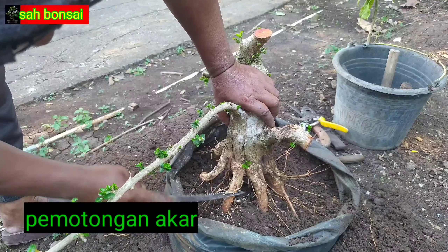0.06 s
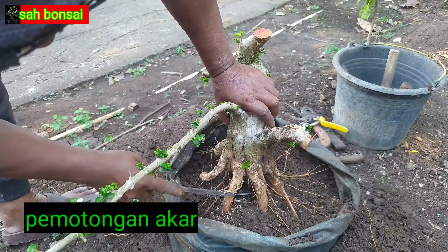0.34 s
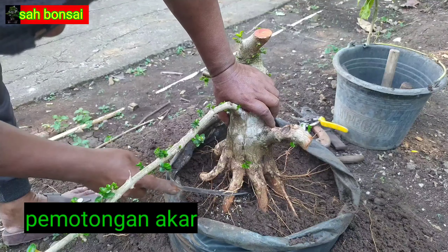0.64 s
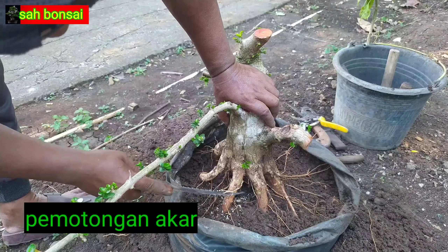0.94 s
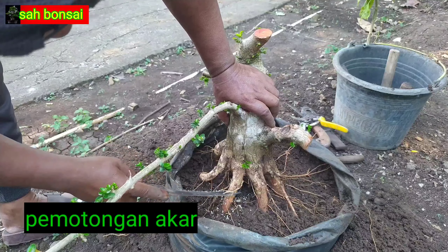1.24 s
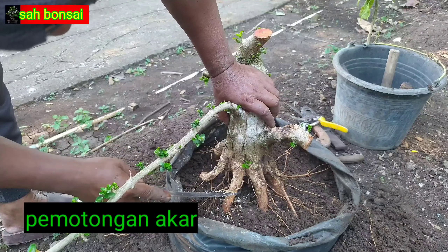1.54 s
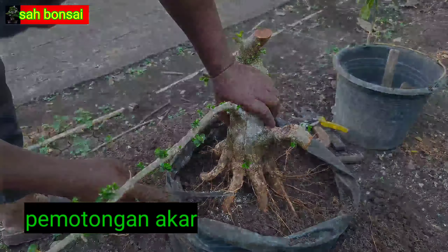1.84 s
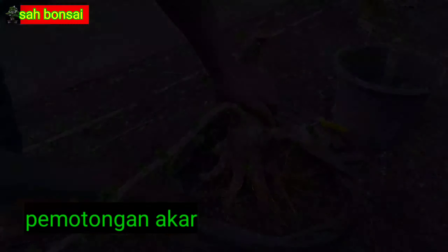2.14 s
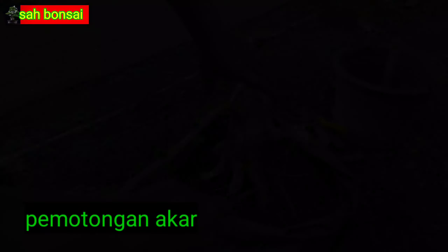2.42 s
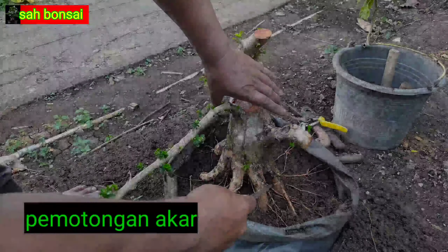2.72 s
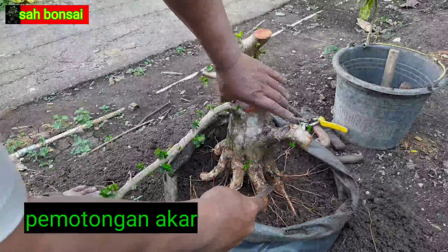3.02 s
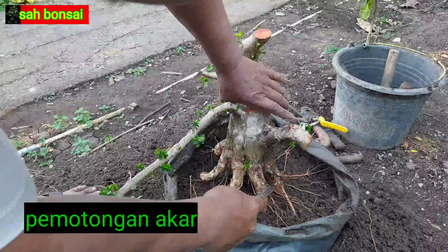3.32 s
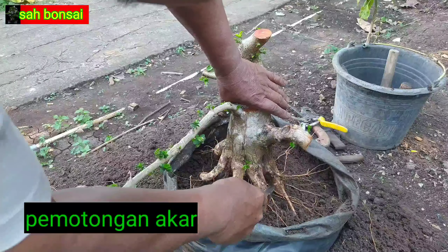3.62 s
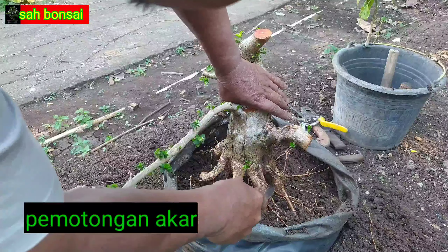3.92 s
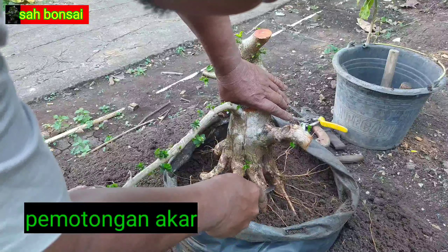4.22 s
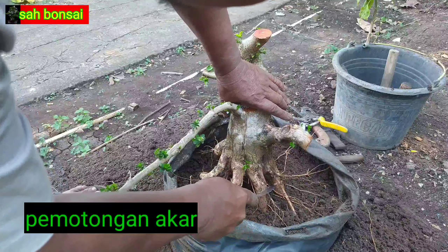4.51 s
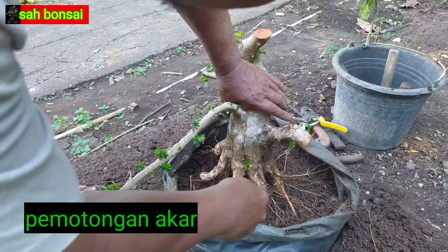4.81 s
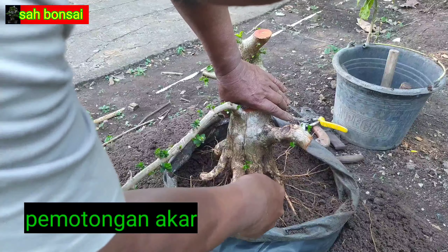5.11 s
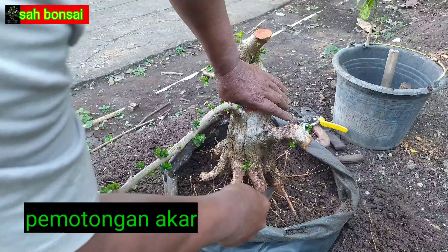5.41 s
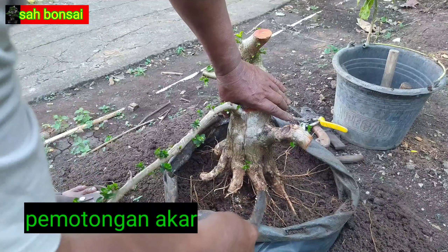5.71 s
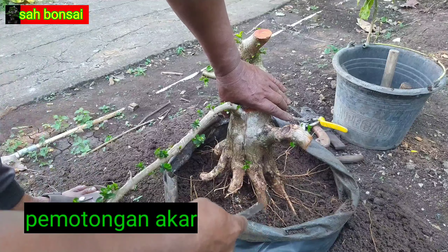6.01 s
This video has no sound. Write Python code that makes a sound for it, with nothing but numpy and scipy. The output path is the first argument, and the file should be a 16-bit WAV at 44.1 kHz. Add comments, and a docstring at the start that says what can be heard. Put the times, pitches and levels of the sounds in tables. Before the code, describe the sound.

Close to the microphone, a pruning saw rasps through woody roots in quick, uneven strokes. Its teeth catch and snap free with sharp cracks and a brief ring, and the root knocks dully. Midway the sawing pauses, leaving a faint rustle of soil, then resumes more lightly. Further off in the yard a small bird chips steadily until near the end.

```python
"""A yard outdoors, one microphone close to a small tree standing in a bag of soil.
A pruning saw works through its woody roots: the teeth rasp on each stroke and now and then snag and
snap free, ringing the blade; the root ball thuds, and loose soil rustles between strokes.
Further off a small bird chips steadily, echoed by the yard; far away, an engine and two bird whistles.
The microphone thins the bass, and a noise suppressor turns down the quiet moments."""
import sys
import numpy as np
from scipy import signal
from scipy.fft import rfft, irfft
from scipy.io import wavfile
from scipy.ndimage import uniform_filter1d

SR = 44100
rng = np.random.default_rng(int(sys.argv[2]) if len(sys.argv) > 2 else 0)


def wrap_up_sound(samples):
    """Save the sound to the file named by the first command line argument, as 16-bit audio."""
    columns = np.atleast_2d(samples).T
    # keep every value between -1 and 1, then stretch to whole-number steps
    tamed = np.clip(columns, -1, 1)
    steps = np.round(tamed * 32767).astype(np.int16)
    wavfile.write(sys.argv[1], SR, steps)


N = 271215
TIME = np.arange(N) / SR

# open air in the yard: frequency_hz, level_db
AIR_SPECTRUM = [(18, -38), (30, -58.5), (48, -15), (129, 8), (382, -3), (554, 0), (745, -6.5), (1160, -6.5),
                (1640, -11.5), (4200, -16.5), (5650, -24.5), (9480, -14), (11000, -61), (14300, -52.5),
                (22000, -120)]
# the far engine's course: time_s, pitch_hz, level_db
ENGINE_DRONE = [(0, 288, -91.5), (3.2, 287.4, -85.5), (3.75, 282.4, -73.5), (4.0, 274.1, -86),
                (4.95, 248.2, -75.5), (5.5, 236.2, -74.5), (5.9, 260.2, -76), (6.15, 255, -87)]
# the blade sliding lightly through loose soil: time_s, rustle_db, hiss_db
SOIL_LEVELS = [(0.0, -65, -82), (0.58, -77, -76), (1.01, -79, -81), (1.16, -65.5, -79), (1.3, -77, -88),
               (1.42, -65.5, -76), (1.56, -70.5, -77.5), (2.02, -74.5, -87), (2.4, -91, -90),
               (2.57, -74, -72), (2.83, -84.5, -82), (3.25, -77.5, -86.5), (4.44, -73.5, -72),
               (4.71, -69.5, -93), (5.02, -72.5, -71), (5.55, -77.5, -92), (5.86, -70.5, -72),
               (6.15, -79, -80.5)]
# shifting crumbs: frequency_hz, level_db
RUSTLE_SPECTRUM = [(150, -12), (400, -0.5), (1100, 2), (1500, -10.5), (3500, -1.5), (5500, -14.5),
                   (9800, -15.5), (10800, -36)]
# soil on the flat of the blade: frequency_hz, level_db
HISS_SPECTRUM = [(2000, -18), (4000, -4.5), (5500, -13), (8000, -6.5), (9600, 4), (10800, -17.5)]
# the shaken root ball: frequency_hz, level_db
THUD_SPECTRUM = [(50, -31.5), (80, -20.5), (108, 0), (160, -6), (210, -17.5), (400, -20), (900, -43.5)]

# saw strokes: fastest_s, length_s, level_db, treble_db
SAW_STROKES = [(.008, 0.035, -40.5, -2), (0.173, 0.079, -56.5, -3), (0.233, 0.028, -46.5, -3),
               (.265, 0.034, -47, 2), (0.382, 0.077, -59.5, -3), (0.451, 0.046, -51.5, 1.5),
               (.523, .04, -52.5, 2.5), (0.563, 0.044, -46, -0.5), (0.696, 0.053, -52, -2.5),
               (0.801, 0.047, -47, -1), (.829, 0.024, -50, -3), (0.899, 0.14, -65, 4),
               (1.055, 0.025, -55, -2), (1.092, 0.027, -49.5, -10), (1.37, 0.051, -48, -1),
               (1.501, 0.036, -60, 2), (1.646, 0.059, -53.5, 14), (1.746, 0.056, -58, 0),
               (1.885, .042, -51.5, 1.5), (2.466, .06, -54, 6), (2.582, 0.063, -48.5, -1),
               (2.652, 0.02, -42, 1), (2.688, 0.037, -48, -4), (4.083, 0.02, -63, 3),
               (4.41, 0.023, -57, 0.5), (4.52, 0.021, -46, 4), (4.545, 0.047, -46.5, 2),
               (4.678, 0.069, -57.5, 3), (4.773, 0.017, -54.5, -2.5), (4.821, 0.058, -47.5, 0),
               (4.976, 0.058, -55, 1.5), (5.116, 0.057, -53, 1), (5.264, 0.019, -61.5, 1.5),
               (5.388, 0.13, -64.5, 4), (5.651, 0.057, -44.5, 0), (5.7, 0.033, -52, 4.5),
               (5.871, 0.021, -61, -20)]
# the roots in the order they are cut, a stout one first; blade_hz is the free blade's main ring:
# until_s, stroke_thud_db, snag_knock_db, ring_over_rasp_db, blade_hz
ROOTS_CUT = [(2.25, -51, -36.5, -10.5, 8740), (4.3, -57, -47.5, -13.5, 9710), (5.55, -55, -50, -18, 8670),
             (6.2, -51.5, -50.5, -27.5, 8830)]
# fibres tearing under the teeth: frequency_hz, level_db
RASP_SPECTRUM = [(150, -44), (250, -10.5), (486, -5.5), (1110, -2.5), (1320, -7.5), (1670, -5),
                 (2370, -5.5), (3100, 3.5), (4060, 1.5), (5570, -14.5), (6420, -8.5), (7520, -12.5),
                 (9540, -6), (10200, -22.5), (11000, -12), (14300, -60), (22000, -120)]
# resonances of root and blade that colour the rasp: centre_hz, width_hz, level_db
RASP_RESONANCES = [(1606, 120, -5), (2930, 400, -13.5), (3940, 140, -1.5), (6920, 310, -1),
                   (9940, 1000, 4.5)]
# modes of the root: pitch_hz, t60_s, level_db
ROOT_MODES = [(523, 0.026, -10.5), (920, 0.019, -4), (1083, 0.032, 1.5), (1720, 0.017, -2)]

# the small bird's chips: middle_s, level_db
BIRD_CHIPS = [(0.128, -57), (0.335, -54.5), (0.533, -49.5), (0.734, -51), (0.935, -55.5), (1.152, -50.5),
              (1.364, -50), (1.571, -54), (1.811, -54.5), (2.035, -57), (2.17, -67), (2.249, -60),
              (2.391, -61), (2.818, -60), (2.909, -70), (3.03, -56.5), (3.238, -55.5), (3.466, -56.5),
              (3.693, -57), (3.941, -56), (4.168, -55.5), (4.406, -58.5), (4.637, -56), (4.86, -54.5),
              (5.083, -55), (5.315, -57.5)]
# the course of one chip: from_middle_s, pitch_hz, level_db, hoarseness (0-1)
CHIP_SHAPE = [(-.014, 1930, -22, 0), (-.007, 2023, -7, 0), (0, 2190, -2.5, .03), (.008, 2370, -4.5, .4),
              (.016, 2000, 0, .85), (.023, 1500, -2.5, .9), (.032, 1156, -2.5, .85), (.042, 1000, -17, 1)]

# a tooth snags and snaps free: start_s, level_db, flex_hz, treble_db
TOOTH_SNAGS = [(0.1528, -21, 2790, -44), (0.1587, -22.5, 3150, -19), (0.2, -32, 2980, -42),
               (0.4401, -39, 3500, -16), (0.7009, -36, 3920, -12), (0.7875, -31, 3100, -12),
               (0.814, -24.5, 3930, -18), (.827, -28, 3050, -3.5), (1.0744, -23.5, 4400, -8),
               (1.0893, -26, 4230, 0), (1.3467, -24.5, 4050, -9.5), (1.359, -26.5, 4260, -1),
               (1.3732, -25, 3790, -9), (1.3869, -27.5, 4100, -5.5), (1.607, -18.5, 3900, -3),
               (1.6204, -17.5, 3750, 0), (1.6301, -18.5, 3950, -1.5), (1.646, -24.5, 3540, 4.5),
               (1.6642, -22, 3860, -0.5), (1.8809, -39, 3960, 1.5), (2.4147, -26.5, 3650, -3),
               (2.4214, -31, 3920, -4.5), (2.4331, -26.5, 3100, -2), (2.439, -36, 3140, -8),
               (2.448, -33.5, 2800, 5), (2.4563, -36.5, 4550, 10.5), (2.4664, -30.5, 3720, -7),
               (2.4748, -33, 4140, -12), (2.4878, -28, 3730, -4), (2.5631, -34, 3760, -1.5),
               (2.5709, -34, 3700, -3), (2.581, -29, 3850, -1.5), (2.589, -27, 3530, -2.5),
               (2.6426, -31, 3620, -10), (2.6464, -27.5, 4050, -10), (4.5142, -24.5, 4030, -8),
               (4.5252, -37, 4100, -12.5), (4.6525, -39, 4070, -14), (4.806, -34.5, 4100, -14),
               (5.6376, -38, 3270, -12)]
# a fibre cracking: frequency_hz, level_db
CRACK_SPECTRUM = [(300, -19), (1000, 0.5), (1350, -13), (1800, -3.5), (2500, -4), (3600, 5), (4500, 0.5),
                  (5500, -7), (6600, -2.5), (8000, -0.5), (9800, 10), (11000, -13.5)]
# high modes of the blade, damped by the wood around it: ratio_to_blade_hz, level_db
BLADE_MODES = [(1, 2), (1.013, -2), (1.11, -12), (1.07, -10), (.81, -11)]
# knocks of the root as it gives: start_s, pitch_hz, peak_db
ROOT_KNOCKS = [(0.819, 152, -43.5), (1.087, 147, -46), (1.36, 159, -42.5), (1.7, 540, -51),
               (2.383, 870, -52), (2.592, 397, -52), (2.659, 382, -51.5), (2.676, 620, -49),
               (2.692, 356, -52), (4.388, 150, -55.5), (5.64, 393, -48.5), (5.866, 600, -54.5),
               (5.871, 1400, -51), (5.875, 2130, -47)]
# a far bird's whistles: middle_s, pitch_hz, level_db
BIRD_WHISTLES = [(2.2, 1186, -72.5), (2.851, 1187, -72)]


def undb(db):
    """Decibels to gain."""
    return 10 ** (np.asarray(db) / 20)


def unit(x):
    """Scale to rms 1."""
    return x / np.sqrt(np.mean(x ** 2))


def add(out, start_s, sound):
    """Mix a sound into out from start_s on."""
    i = max(int(start_s * SR), 0)
    out[i:i + len(sound)] += sound[:max(N - i, 0)]


def curves(table):
    """Interpolate each column of a table along the times in its first."""
    times, *columns = np.transpose(table)
    return [np.interp(TIME, times, column) for column in columns]


def colour(x, spectrum, size=4096):
    """Causal filter of unit power gain, shaped by rows of frequency_hz, level_db."""
    hz, db = np.transpose(spectrum)
    bin_hz = np.arange(size // 2 + 1) * SR / size
    gain = undb(np.interp(np.log(bin_hz + 1), np.log(hz), db))
    cepstrum = irfft(np.log(gain))[:size // 2]
    cepstrum[1:] *= 2  # minimum phase
    response = irfft(np.exp(rfft(cepstrum, size)))
    return signal.fftconvolve(x, response / np.linalg.norm(response))[:len(x)]


def filtered(x, order, hz, kind):
    """Low-, high- or band-pass a sound."""
    return signal.sosfilt(signal.butter(order, hz, kind, fs=SR, output="sos"), x)


def resonance(x, hz, width_hz):
    """What one resonance passes of a sound."""
    return signal.lfilter(*signal.iirpeak(hz, hz / width_hz, SR), x)


def treble(x, hz=5800):
    """The part of a sound above hz."""
    return signal.sosfiltfilt(signal.butter(3, hz, "high", fs=SR, output="sos"), x)


def grains(per_s, spread_db):
    """Dense tiny fractures of differing size; rms 1."""
    hits = (rng.random(N) < per_s / SR) * rng.standard_normal(N)
    sizes = undb(spread_db * np.minimum(rng.exponential(size=N), 4))
    return unit(hits * sizes)


def swell(t, rise_s, fall_s):
    """A bell of height 1 at t = 0, each side with its own width."""
    return np.exp(-(t / np.where(t < 0, rise_s, fall_s)) ** 2)


def decay(t, t60_s, rise_s):
    """A soft onset, then a fall of 60 dB every t60_s."""
    return np.exp(-np.log(1000) * t / t60_s) * (1 - np.exp(-(t / rise_s) ** 2))


def echo(x, t60_s, wet_db, rise_s):
    """Add diffuse reflections from walls, trees and ground."""
    tail = rng.standard_normal(SR) * decay(np.arange(SR) / SR, t60_s, rise_s)
    return x + undb(wet_db) * signal.fftconvolve(x, tail / np.linalg.norm(tail))[:N]


def root_at(time_s):
    """The qualities of the root being cut at time_s."""
    return next((row[1:] for row in ROOTS_CUT if time_s < row[0]), ROOTS_CUT[-1][1:])


def yard_air(level_db=-73):
    """Faint outdoor air all round the microphone."""
    return undb(level_db) * colour(rng.standard_normal(N), AIR_SPECTRUM)


def far_engine(waver=0.043, octave_db=-2, rumble_db=3, rumble_hz=155):
    """Distant traffic: one engine rumbles and drones with its octave."""
    hz, db = curves(ENGINE_DRONE)
    wobble = 1 + waver * unit(uniform_filter1d(rng.standard_normal(N), size=2000))
    phase = 2 * np.pi * np.cumsum(wobble * hz) / SR
    rumble = unit(filtered(rng.standard_normal(N), 2, (rumble_hz * 0.78, rumble_hz * 1.15), "band"))
    return undb(db) * (np.sin(phase) + undb(octave_db) * np.sin(2 * phase) + undb(rumble_db) * rumble)


def loose_soil(strokes, settle_s=0.065, crumble_db=-20):
    """Close by, crumbs shift and the blade hisses through them; every stroke shakes more loose."""
    rustle_db, hiss_db = curves(SOIL_LEVELS)
    keep = np.exp(-1 / (settle_s * SR))
    lingering_power = signal.lfilter([1 - keep], [1, -keep], strokes ** 2)
    moving = np.sqrt(undb(rustle_db) ** 2 + undb(crumble_db) ** 2 * lingering_power)
    rustle = colour(grains(per_s=5000, spread_db=2), RUSTLE_SPECTRUM)
    hiss = colour(grains(per_s=8000, spread_db=1), HISS_SPECTRUM)
    shifting = colour(rng.standard_normal(N), THUD_SPECTRUM)
    return moving * (undb(1) * rustle + shifting) + undb(hiss_db + 3) * hiss


def sawing(tooth_hz=210, uneven_db=3.5, shift=0.014, usual_stroke_db=-50.5, thud_slope=0.7):
    """Close by, teeth tear fibres at a rate that follows the blade's speed, shaking the root ball."""
    tearing = colour(grains(per_s=12000, spread_db=0.45), RASP_SPECTRUM)
    shaking = colour(rng.standard_normal(N), THUD_SPECTRUM)
    rasps, thuds = np.zeros((2, N))
    for fastest_s, length_s, db, treble_db in SAW_STROKES:
        thud_db, _, ring_db, _ = root_at(fastest_s)
        span = np.abs(TIME - fastest_s) < 0.15
        speed = swell(TIME[span] - fastest_s, rise_s=0.46 * length_s, fall_s=0.54 * length_s)
        teeth_per_s = tooth_hz * np.exp(0.2 * rng.standard_normal()) * (1 + speed) / 2
        teeth = np.cumsum(teeth_per_s) / SR
        # no two teeth bite equally deep
        depth = undb(uneven_db * rng.standard_normal(256))[teeth.astype(int) % 256]
        bite = unit(depth * (1 + np.exp(-(teeth % 1))))
        torn = bite * tearing[span]
        # each stroke meets the root at another point, which shifts the resonances
        stretch = 1 + shift * rng.uniform(-1, 1)
        body = sum(undb(gain_db) * resonance(torn, hz * stretch, width_hz)
                   for hz, width_hz, gain_db in RASP_RESONANCES)
        rasp = unit(torn + body)
        edge = (undb(treble_db) - 1) * treble(rasp, hz=4600)
        wood = unit(sum(undb(mode_db) * resonance(rasp, hz, width_hz=90)
                        for hz, _, mode_db in ROOT_MODES))
        rasps[span] += speed * undb(db) * (rasp + edge + undb(ring_db) * wood)
        thuds[span] += speed * undb(thud_db + thud_slope * (db - usual_stroke_db)) * shaking[span]
    return rasps + undb(-6.5) * echo(thuds, t60_s=0.33, wet_db=-4.5, rise_s=0.022)


def chipping_bird(throat_hz=3950, throat_width_hz=1150, flutter_hz=600):
    """Further off, each chip rises cleanly, then plunges hoarsely through the throat resonance."""
    out = np.zeros(N)
    moments, pitch_hz, level_db, hoarseness = np.transpose(CHIP_SHAPE)
    t = np.arange(moments[0], moments[-1], 1 / SR)
    harmonics = np.arange(1, 5)[:, None]
    for middle_s, db in BIRD_CHIPS:
        paced = t * (1 + 0.078 * rng.standard_normal())  # each chip has its own pace and pitch
        hz = harmonics * np.interp(paced, moments, pitch_hz) * (1 + 0.014 * rng.standard_normal())
        hoarse = np.interp(paced, moments, hoarseness)
        throat = np.exp(-((hz - throat_hz) / throat_width_hz) ** 4)
        # the clean rise also carries its fundamental and third harmonic
        throat += (1 - hoarse) * undb(-11) * np.exp(-((hz - 4500) / 2900) ** 2)
        flutter = unit(filtered(rng.standard_normal(hz.shape), 4, flutter_hz, "low"))
        tones = np.sin(2 * np.pi * np.cumsum(hz, axis=1) / SR)
        partials = (np.sqrt(1 - hoarse) + np.sqrt(hoarse) * flutter) * tones
        envelope = undb(db + np.interp(paced, moments, level_db))
        add(out, middle_s + t[0], envelope * np.sum(throat * partials, axis=0))
    return echo(out, t60_s=0.35, wet_db=-1.5, rise_s=0.0032)


def snagging_teeth(crack_s=0.0019, splinter_s=0.024, splinter_db=-20, jolt_s=0.021):
    """Close by, a fibre cracks, the freed blade flexes and rings, and the root knocks and jolts."""
    out = np.zeros(N)
    t = np.arange(SR // 10) / SR

    def ring(hz, t60_s, detune, rise_s=0.00093):
        """One dying mode, its pitch scattered by detune."""
        hz = hz * (1 + detune * rng.standard_normal())
        return np.sin(2 * np.pi * hz * t) * decay(t, t60_s, rise_s)

    breaking = np.exp(-t / crack_s) + undb(splinter_db) * np.exp(-t / splinter_s)
    for start_s, db, flex_hz, treble_db in TOOTH_SNAGS:
        _, knock_db, _, blade_hz = root_at(start_s)
        crack = colour(rng.standard_normal(len(t)) * breaking, CRACK_SPECTRUM)
        crack += (undb(treble_db) - 1) * treble(crack)
        flex = ring(flex_hz, t60_s=0.0088, detune=0)
        blade = sum(undb(mode_db) * ring(ratio * blade_hz, t60_s=0.03, detune=0.0017, rise_s=0.0015)
                    for ratio, mode_db in BLADE_MODES)
        knock = sum(undb(mode_db) * ring(hz, t60_s, detune=0.054) for hz, t60_s, mode_db in ROOT_MODES)
        jolt = colour(rng.standard_normal(len(t)) * np.exp(-t / jolt_s), THUD_SPECTRUM)
        add(out, start_s, undb(db) * (undb(-4) * crack + undb(6) * flex + undb(treble_db - 7.5) * blade))
        add(out, start_s, undb(knock_db) * (undb(-12.5) * knock + undb(-19) * jolt))
    return out


def knocking_root(t60_cycles=28):
    """Close by, the root gives under the saw with dead knocks; the lower ones last longer."""
    out = np.zeros(N)
    t = np.arange(SR // 5) / SR
    for start_s, hz, peak_db in ROOT_KNOCKS:
        push = rng.standard_normal(len(t)) * np.exp(-np.log(1000) * t * hz / t60_cycles)
        knock = filtered(push, 2, (hz * 0.68, hz * 1.25), "band")
        add(out, start_s, undb(peak_db) * knock / np.abs(knock).max())
    return out


def whistling_bird(swell_s=0.029):
    """Far away, a bird gives two short, pure whistles."""
    return sum(undb(db) * swell(TIME - middle_s, swell_s, swell_s) * np.sin(2 * np.pi * hz * TIME)
               for middle_s, hz, db in BIRD_WHISTLES)


def scene():
    """The yard in mono: saw and soil close to the microphone, birds and engine further off."""
    strokes = sawing()
    saw = echo(strokes + snagging_teeth() + knocking_root(), t60_s=0.22, wet_db=-20.5, rise_s=0.008)
    near = saw + loose_soil(strokes)
    far = chipping_bird() + far_engine() + whistling_bird()
    return (near + far + yard_air())[None]


def record(dry, threshold_db=-71, duck_db=-7, knee_db=3.5, listen_hz=1500, top_hz=10300):
    """The microphone thins the bass; a suppressor ducks when the treble is quiet; the top is cut."""
    thin = filtered(dry, 2, 60, "high")
    treble_power = uniform_filter1d(treble(thin, listen_hz) ** 2, size=1300)
    heard_db = 10 * np.log10(np.abs(treble_power) + 1e-14)
    quiet = (1 - np.tanh((heard_db - threshold_db) / (2 * knee_db))) / 2
    top_cut = signal.ellip(7, 0.3, 65, top_hz, fs=SR, output="sos")
    return signal.sosfilt(top_cut, thin * undb(duck_db * quiet))


dry = scene()
out = record(dry)
wrap_up_sound(out)
```